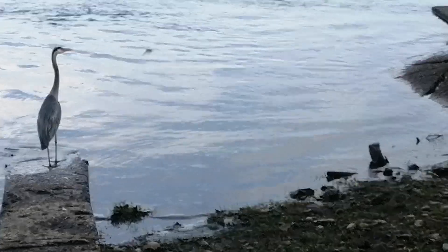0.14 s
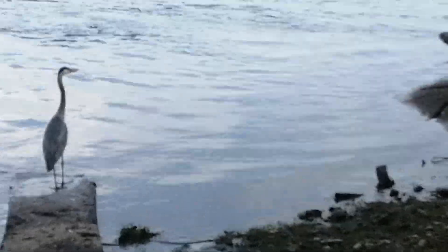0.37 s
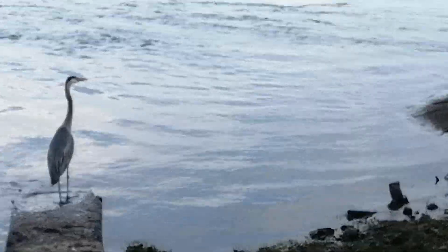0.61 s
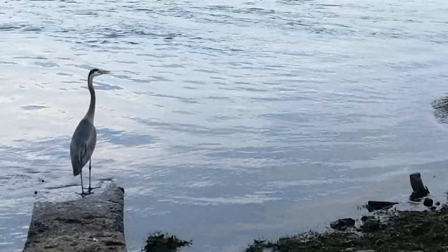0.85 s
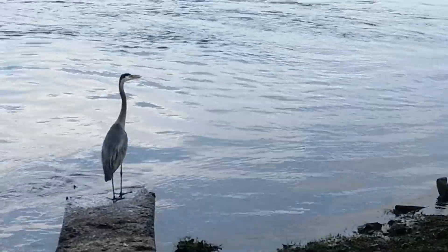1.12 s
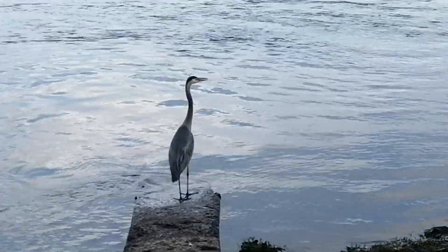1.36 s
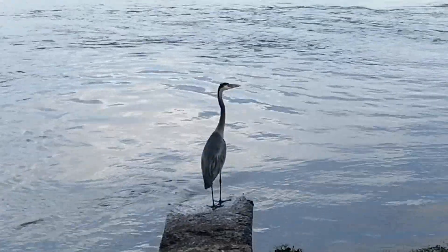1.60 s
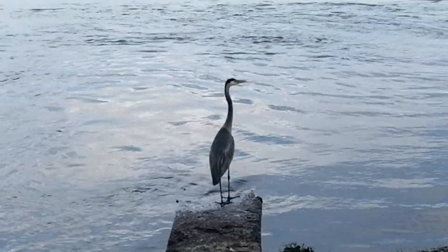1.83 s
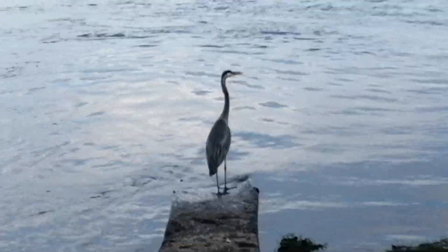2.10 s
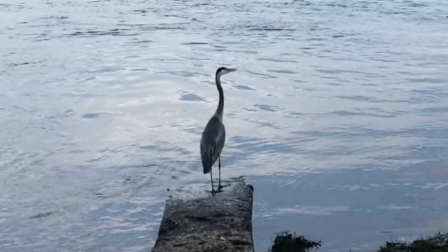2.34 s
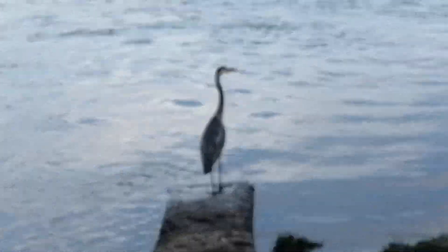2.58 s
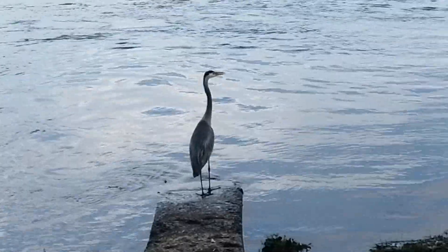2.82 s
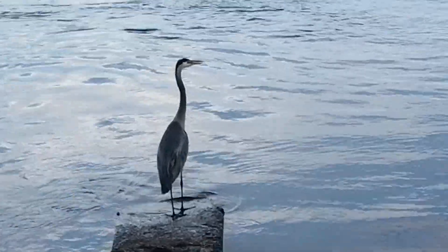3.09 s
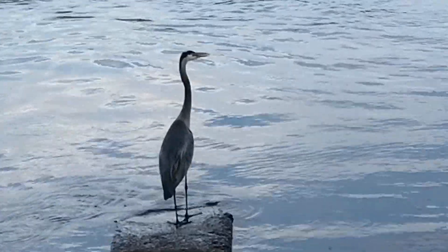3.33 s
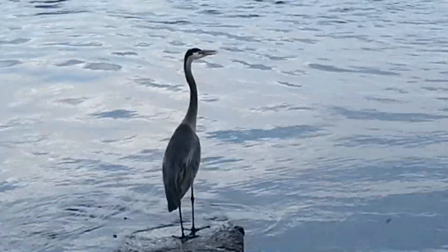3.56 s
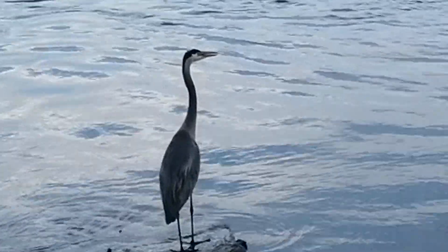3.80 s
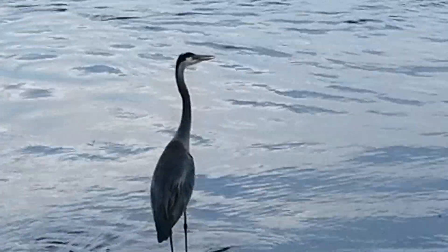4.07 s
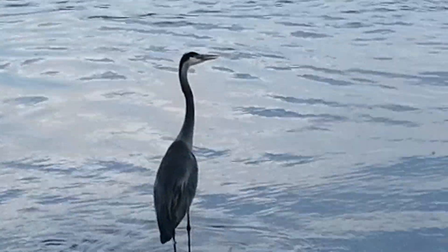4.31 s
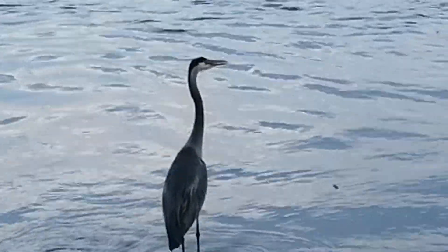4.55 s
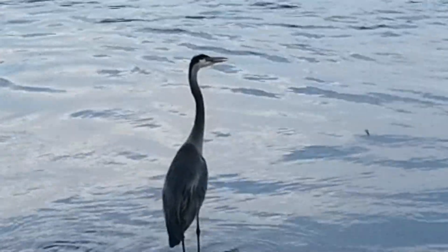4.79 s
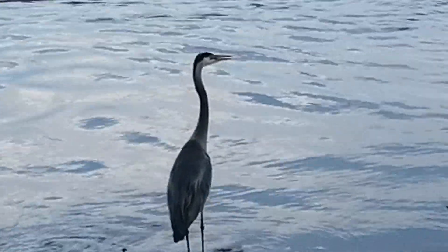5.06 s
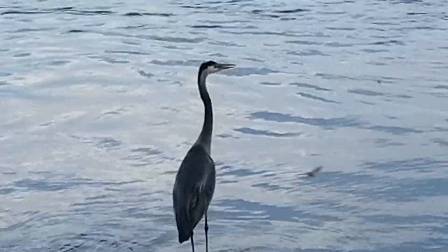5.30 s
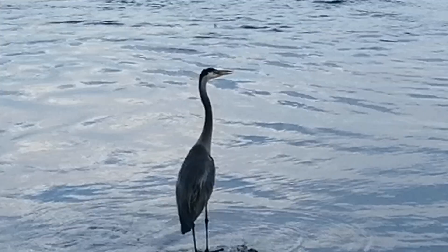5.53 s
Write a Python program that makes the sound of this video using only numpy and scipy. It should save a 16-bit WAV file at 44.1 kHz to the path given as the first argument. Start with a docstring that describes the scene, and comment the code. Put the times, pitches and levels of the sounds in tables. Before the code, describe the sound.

Quiet riverside air with low wind rumble and a soft, slowly receding water rush, broken by one loud finger bump on the microphone's right side.

```python
"""A calm riverside, heard from a hand-held camera with two spaced microphone ports.
Low wind rumble, a broad rush of far water that slowly recedes, a steady wash of distant water and fine hiss:
shaped noise. A finger bumps and drags across the right port (shoves ringing its air, with crackle), then rubs
the case twice (banded noise); the case ticks now and then (short decaying cycles).
The linked gain control ducks both channels after the bump."""
import sys
import numpy as np
from scipy import signal
from scipy.fft import rfft, irfft, next_fast_len
from scipy.io import wavfile
from scipy.ndimage import uniform_filter1d, minimum_filter1d, map_coordinates

SR = 44100
rng = np.random.default_rng(int(sys.argv[2]) if len(sys.argv) > 2 else 0)


def transcribe(u):
    """Save the signal u as a 16-bit wav file named by the first command-line argument.

    u: samples, shape (n,) or (channels, n), limited to [-1, 1]; the rate is SR.
    q: integer samples, one column per channel.
    """
    v = np.clip(np.atleast_2d(u).T, -1, 1)
    q = np.round(v * 32767).astype(np.int16)
    wavfile.write(sys.argv[1], SR, q)


def gain_from_db(level_db):
    """Turn a decibel level (scalar or array-like) into a linear amplitude factor."""
    decades = np.asarray(level_db, float) / 20
    return 10 ** decades


N = 249606
T = np.arange(N) / SR

# finger slips on the port, pulling out and pushing in by turns: start_s, push_db, dull_crackle_db
SLIPS = [(1.8011, 4, 3), (1.8044, 14, -3), (1.808, 10.5, -9), (1.811, -2, -16), (1.817, 10.5, -2),
         (1.8194, 7.5, -7), (1.827, 5, -6), (1.8322, -11, -6)]
# dry skin scuffs as the finger touches, lands, slips and lifts: start_s, bright_crackle_db, t60_s
SCUFFS = [(1.7865, -41, .04), (1.794, -10.5, 0.094), (1.798, -0.5, 0.01), (1.817, -30, 0.023),
          (1.831, -27, 0.044), (1.836, -17, 0.022), (1.84, -20, 0.01)]
# resonances of the covered port: centre_hz, width_hz, level_db
PORT_MODES = [(55.5, 150, 4.5), (121, 135, 7.5), (172, 102, 3.5), (410, 390, -7), (1300, 1100, -25.5)]
# colour of the bright skin crackle: frequency_hz, density_db_per_hz
SKIN_SPECTRUM = [(300, -8), (1000, -11), (2500, -9), (3700, -11.5), (5200, -10.5), (7300, -22.5),
                 (10000, -40), (15000, -47), (16000, -62)]
# strokes of a fingertip on the case: start_s, rise_s, fall_s, level_db, upper_band_db
RUBS = [(2.035, 0.0073, 0.08, -62.5, 8.5), (2.105, 0.052, 0.024, -59.5, 0)]
# the case under a rubbing finger: centre_hz, width_hz, level_db
RUB_BANDS = [(5540, 2900, 0.5), (10000, 4300, -9.5)]
# ticks of the case, and at 1.786 s the click of the finger first touching the right port: start_s, peak_db,
# pitch_hz, left_right_db
TICKS = [(0.3849, -42.5, 6540, -7), (0.3903, -39, 5760, 0), (0.393, -43, 6000, 0), (.4475, -54, 6000, 13),
         (1.512, -45, 7000, 1), (1.571, -53, 6450, 0), (1.786, -42, 10000, -22), (2.666, -51, 4500, 5),
         (3.858, -54, 6000, -6), (3.886, -53, 9000, -6), (3.936, -56, 10500, -14)]
# far water: frequency_hz, density_db_per_hz
RUSH_SPECTRUM = [(100, -23.5), (240, -2), (300, -8), (570, -8.5), (890, -6), (1170, -9.5), (2000, -13),
                 (3000, -22), (4300, -37.5), (8000, -58)]
# steady background wash of distant water: frequency_hz, density_db_per_hz
WASH_SPECTRUM = [(200, -38), (330, 2.5), (430, 3.5), (700, -12), (1300, -5), (2200, -8), (2900, -11),
                 (3600, -34), (6000, -37)]
# wind rumble: frequency_hz, density_db_per_hz
RUMBLE_SPECTRUM = [(15, -38), (25, -7), (54, -2.5), (118, -5.5), (194, -11.5), (300, -20.5), (390, -43),
                   (660, -120)]
# wind strength, with its lulls: time_s, level_db
WIND_LEVELS = [(0, -53.5), (.75, -54), (1.29, -51.5), (1.35, -54.5), (2.2, -56), (2.46, -61), (2.62, -53.5),
               (2.96, -55.5), (3.07, -58), (3.16, -55), (5.66, -55.5)]
# fine hiss: frequency_hz, density_db_per_hz
HISS_SPECTRUM = [(1500, -17), (3500, 1.5), (5700, -2), (7400, -3.5), (8400, -7.5), (9400, -5.5),
                 (11000, -14.5), (14300, -23.5), (15050, -35), (15250, -70)]
# diffuse sound at the two spaced ports: frequency_hz, left_right_likeness (-1 to 1)
PORT_LIKENESS = [(60, 0.94), (130, 0.94), (290, 0.85), (640, 0.37), (1410, -0.31), (3100, 0.013),
                 (6820, -0.041), (15000, 0.0056)]

# a hand shades the ports and the left grows louder for a moment
SHADE_S, SHADE_WIDTH_S, SHADE_PAN_DB = 2.25, 0.16, 3.5
# the far water recedes ever more slowly towards this change
RECEDE_LIMIT_DB, RECEDE_TIME_CONSTANT_S = -22, 6.64
# the grip shifts on the ports and the left-right balance moves
GRIP_END_S, GRIP_LENGTH_S = 2.25, 0.36
RIGHT_ONLY = np.array([[0], [1]])


def unit(x):
    """Scaled to rms 1."""
    return x / np.sqrt(np.mean(x ** 2) + 1e-20)


def along(points, hz):
    """Points of (Hz, value) read on a log frequency axis."""
    f, v = np.transpose(points)
    return np.interp(np.log(hz + 1), np.log(f + 1), v)


def filtered(x, response):
    """x times a complex response of frequency."""
    m = next_fast_len(x.shape[-1] + 8192)
    return irfft(rfft(x, m) * response(np.fft.rfftfreq(m, 1 / SR)), m)[..., :x.shape[-1]]


def resonances(modes):
    """Causal response of (Hz, width Hz, dB) resonances, summed with alternating signs."""
    def response(f):
        total = 0
        for k, (centre, width, db) in enumerate(modes):
            damping = 1j * f * width
            total = total + (-1) ** k * gain_from_db(db) * damping / (centre * centre - f * f + damping)
        return total
    return response


def wobble(rate):
    """A smooth random curve, rate knots a second."""
    knots = rng.standard_normal(int(N * rate / SR) + 4)
    return map_coordinates(knots, [T * rate])


def sides(pan_db):
    """Left and right gains for a left-right difference in dB."""
    return gain_from_db(np.array([pan_db / 2, -pan_db / 2]))


def diffuse(spectrum, patchy_db):
    """Stereo noise from all around, with patches of random gain; its mid signal has rms 1."""
    z = signal.stft(rng.standard_normal((2, N)), nperseg=512)[2]
    field = uniform_filter1d(rng.standard_normal(z.shape[1:]), size=5, axis=0)  # over frequency
    field = uniform_filter1d(field, size=12, axis=1)  # over time
    pair = signal.istft(z * gain_from_db(patchy_db * unit(field)), nperseg=512)[1][:, :N]

    def mid_side_response(hz):
        # this angle between mid and side yields the likeness of left and right
        angle = np.arccos(np.clip(along(PORT_LIKENESS, hz), -1, 1)) / 2
        return gain_from_db(along(spectrum, hz)) * [np.cos(angle), np.sin(angle)]

    mid, side = filtered(pair, mid_side_response)
    return np.array([mid + side, mid - side]) / np.sqrt(np.mean(mid ** 2))


def burst(start_s, db, t60_s):
    """A sudden start, then a decay of 60 dB in t60_s."""
    return (T >= start_s) * gain_from_db(db - 60 * np.abs(T - start_s) / t60_s)


def bump():
    """Each slip jolts the air trapped in the port with a dull crackle; each scuff sheds bright grit."""
    pushes = np.zeros(N)
    for k, (s, push_db, _) in enumerate(SLIPS):
        pushes[round(s * SR)] = -(-1) ** k * gain_from_db(push_db) * SR / 1000  # area of a one-millisecond shove
    bright = sum(burst(*row) for row in SCUFFS)
    dull = sum(burst(s, db, t60_s=0.027) for s, _, db in SLIPS)
    bursts = uniform_filter1d(np.array([bright, dull]), size=40)  # each swells within a millisecond
    grit = rng.standard_normal((2, N)) * gain_from_db(1.6 * wobble(2000))  # clumped grains

    def colours(hz):
        skin = gain_from_db(along(SKIN_SPECTRUM, hz))
        muffled = resonances([(500, 1200, 0)])(hz) / (1 + 1j * hz / 4000) ** 3
        return np.array([skin, muffled])

    def port(hz):
        soft = 1 / (1 + 1j * hz / 5000) ** 3  # flesh rounds the shove
        return resonances(PORT_MODES)(hz) * soft

    grit_rms = np.std(filtered(grit, colours), axis=1, keepdims=True)
    crackle = filtered(bursts * grit, colours) / grit_rms
    return filtered(pushes, port) + crackle.sum(0)


def rub_band(band):
    """Fingertip noise through one resonant band of the case."""
    noise = rng.standard_normal(N)
    return gain_from_db(band[2]) * unit(filtered(noise, lambda hz: resonances([band])(hz) ** 3))


def rubs():
    """A dry fingertip hisses in two bands of the case, each stroke rising, holding and falling."""
    out = np.zeros(N)
    hold_s = 0.0084
    for s, rise, fall, db, upper_db in RUBS:
        ramp = np.interp(T, np.cumsum([s, rise, hold_s, fall]), [0, 1, 1, 0])
        stroke = np.sin(np.pi / 2 * ramp) ** 1.7
        low, high = [rub_band(band) for band in RUB_BANDS]
        out += gain_from_db(db) * stroke * (low + gain_from_db(upper_db) * high)
    return out


def ticks():
    """Tiny snaps of the case, and the click of the finger's first touch, with a rounded start: a few cycles,
    over a lower body."""
    out, t = np.zeros((2, N)), T[:200]
    for s, db, hz, pan_db in TICKS:
        cycles = hz * t
        snap = cycles ** 3 * np.exp(-cycles / 0.44) * np.sin(2 * np.pi * cycles)
        body = 0.37 * cycles * np.exp(-cycles / 1.14) * np.sin(0.6 * np.pi * cycles)
        tick = snap + body
        first = round(s * SR)
        out[:, first:first + len(t)] += sides(pan_db)[:, None] * gain_from_db(db) * tick / np.abs(tick).max()
    return out


def shade():
    """Bell-shaped course of the hand shading the ports, 0 to 1."""
    return np.exp(-((T - SHADE_S) / SHADE_WIDTH_S) ** 2)


def receded_db():
    """Level change as the far water recedes, an exponential approach in dB."""
    return RECEDE_LIMIT_DB * (1 - np.exp(-T / RECEDE_TIME_CONSTANT_S))


def grip_gains(before_db, after_db):
    """Left and right gains as the grip shifts on the ports, with the left favoured while a hand shades them."""
    balance_db = np.interp(T, [GRIP_END_S - GRIP_LENGTH_S, GRIP_END_S], [before_db, after_db])
    return sides(balance_db + SHADE_PAN_DB * shade())


def rush():
    """Far water: broad diffuse noise that recedes, wavers slightly and is raised briefly by the shading hand."""
    level_db = -53 + receded_db() + 1.4 * shade() + 0.19 * wobble(4.12)
    return gain_from_db(level_db) * grip_gains(1.2, 1.5) * diffuse(RUSH_SPECTRUM, patchy_db=0.5)


def wash():
    """Steady background wash of distant water: diffuse noise at a constant level, slightly to the left."""
    return gain_from_db(-70.5) * sides(2.2)[:, None] * diffuse(WASH_SPECTRUM, patchy_db=0.5)


def wind():
    """Low rumble in soft lumps, nearly alike at both ports, with lulls."""
    level_db = np.interp(T, *np.transpose(WIND_LEVELS)) + 0.68 * wobble(9.4)
    return gain_from_db(level_db) * sides(1.2)[:, None] * diffuse(RUMBLE_SPECTRUM, patchy_db=0.7)


def hiss():
    """Smooth fine noise that partly follows the receding rush, rises with the shading hand and thins late on."""
    follow_db = 0.33 * receded_db()
    thin_db = -1.5 * np.maximum(T - 4.36, 0)  # dB per second, from 4.36 s
    level_db = -73 + follow_db + thin_db + 3.5 * shade()
    return gain_from_db(level_db) * grip_gains(-1.7, -5) * diffuse(HISS_SPECTRUM, patchy_db=0.5)


def shimmer():
    """A thin, fluttering band of hiss, to the right, sets in near the end."""
    start_s, rise_s = 4.75, 0.14
    band = unit(filtered(rng.standard_normal(N), lambda hz: resonances([(4150, 1200, 0)])(hz) ** 2))
    onset = np.clip((T - start_s) / rise_s, 0, 1)
    return onset * gain_from_db(-84 + 1.2 * wobble(12)) * band * sides(-7.0)[:, None]


def scene():
    """The bump and rubs on the right port do not reach the left one, and the click of the first touch reaches
    it only faintly; ticks and the riverside reach both."""
    fade_in = np.clip((T - 0.031) / 0.022, 0, 1) ** 2  # the sound sets in at 0.031 s
    riverside = rush() + wash() + wind() + hiss() + shimmer()
    faint = fade_in * (riverside + ticks()) + RIGHT_ONLY * rubs()
    faint = filtered(faint, lambda hz: hz < 15150)  # nothing faint above this, Hz
    return faint + RIGHT_ONLY * bump()


def gain_control(x, knee_db, share, ahead, release, bass_hz, bass_share):
    """One gain for both channels: drops just ahead of a peak, then the cut in dB dies away; bass is cut less."""
    peak_db = 20 * np.log10(np.abs(x).max(0) + 1e-9)
    over = np.maximum(peak_db - knee_db, 1e-3)
    span = round(ahead * SR)
    held = np.log(-minimum_filter1d(-share * over, span + 1))
    cut = -np.exp(np.maximum.accumulate(held + T / release) - T / release)  # exponential release
    cut = np.roll(uniform_filter1d(cut, span), -span // 2)  # smoothed, then moved earlier
    bass = filtered(x, lambda hz: 1 / (1 + (hz / bass_hz) ** 2))
    return bass * gain_from_db(bass_share * cut) + (x - bass) * gain_from_db(cut)


def roll_off(x):
    """The treble ends steeply here."""
    return signal.sosfilt(signal.butter(12, 16480, fs=SR, output="sos"), x)


def record(dry):
    """The two ports through the linked gain control; ahead and release in seconds."""
    mix = gain_control(dry, knee_db=-17.0, share=0.71, ahead=0.0034, release=0.077,
                       bass_hz=250, bass_share=0.59)
    return roll_off(mix)


dry = scene()
out = record(dry)
transcribe(out)
```